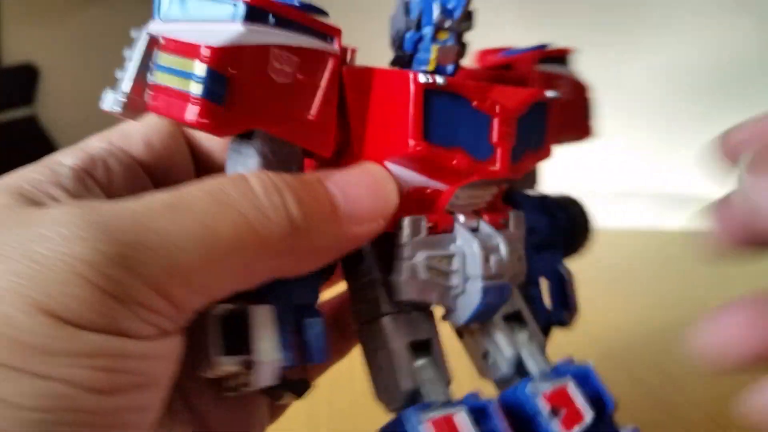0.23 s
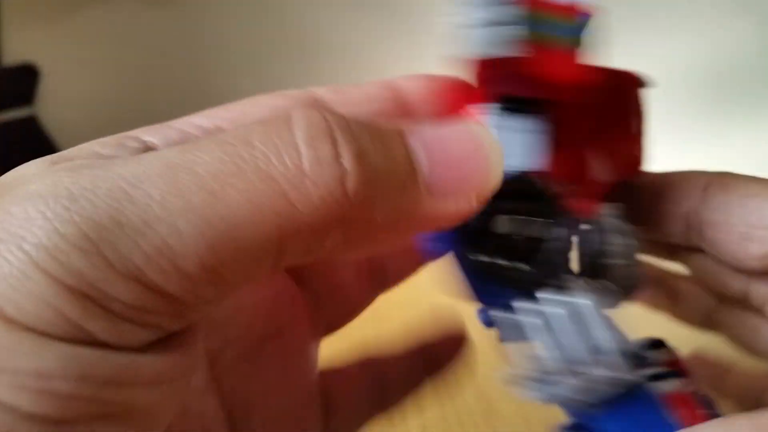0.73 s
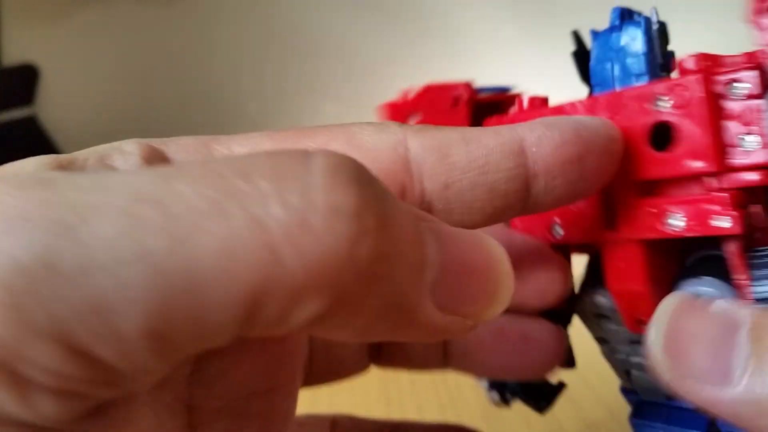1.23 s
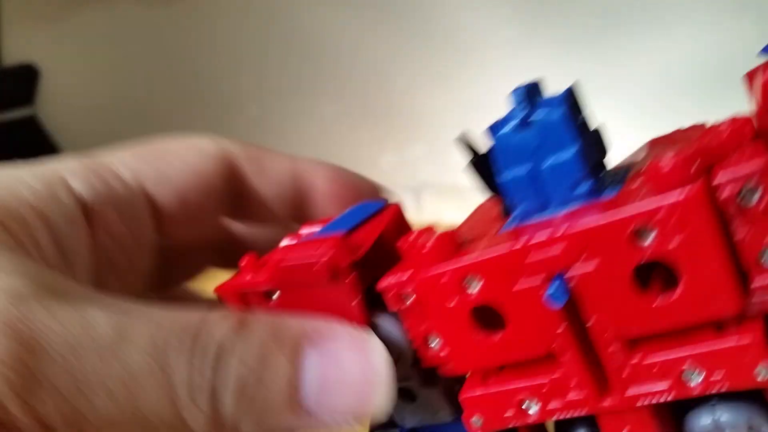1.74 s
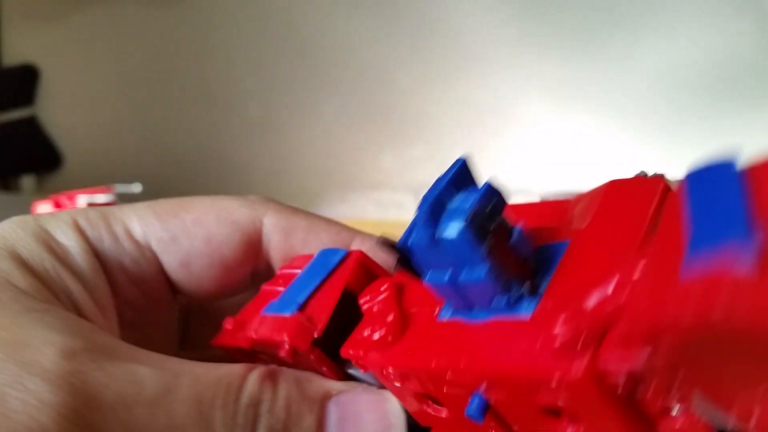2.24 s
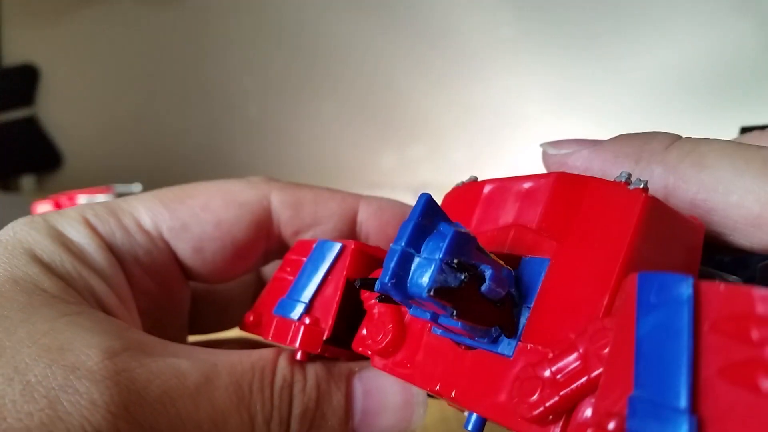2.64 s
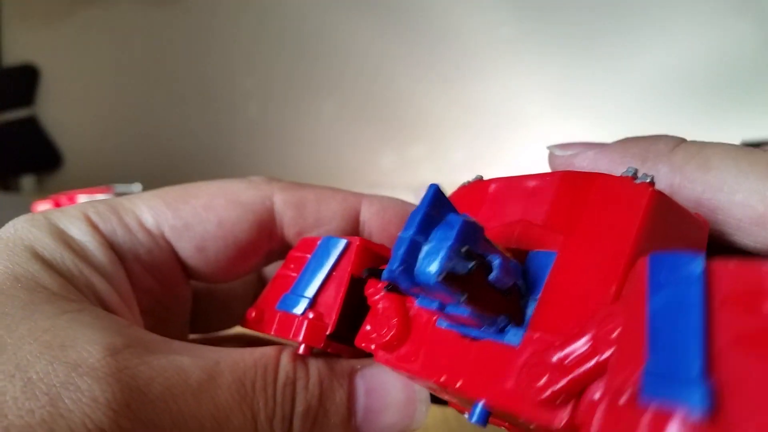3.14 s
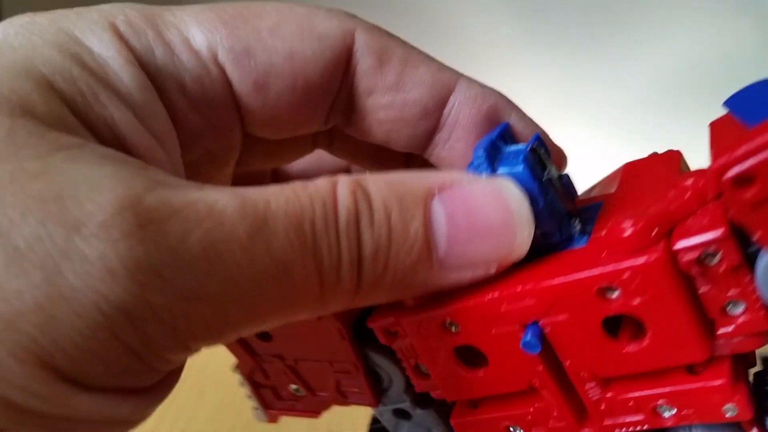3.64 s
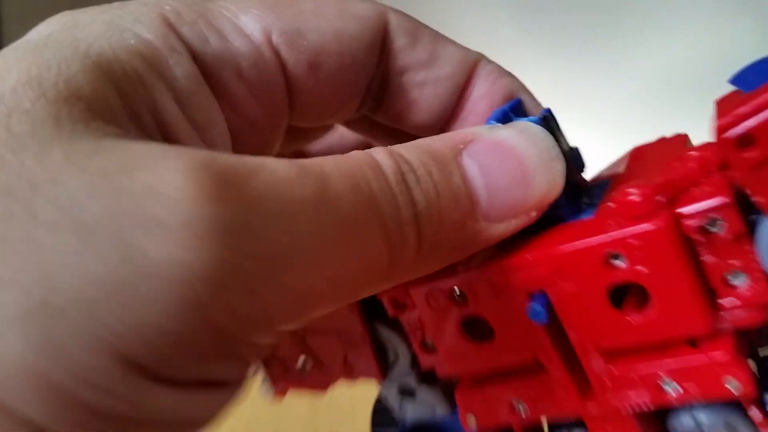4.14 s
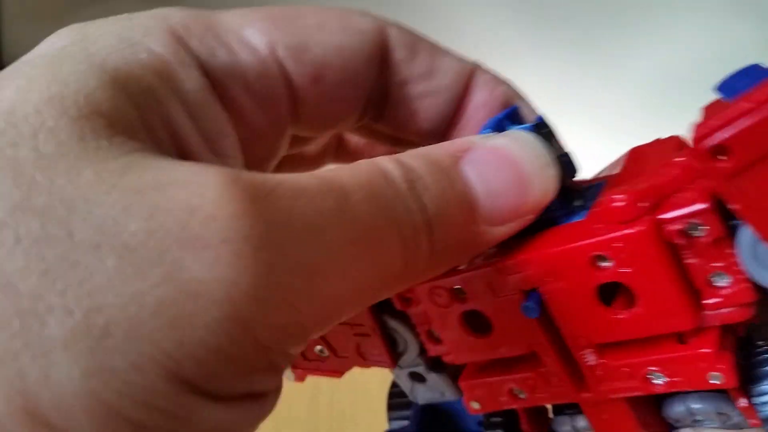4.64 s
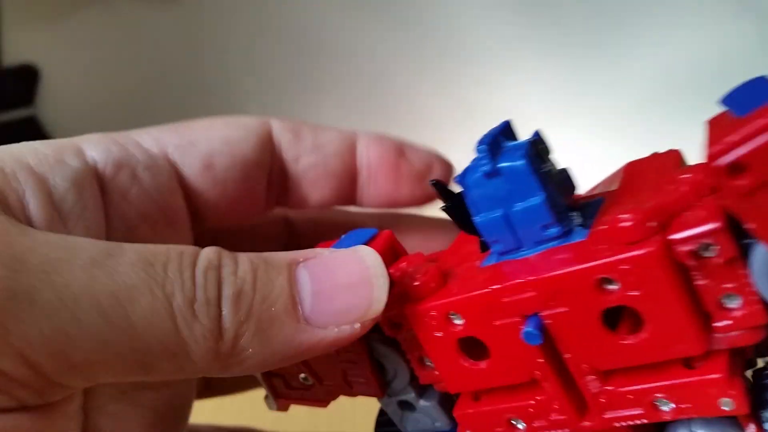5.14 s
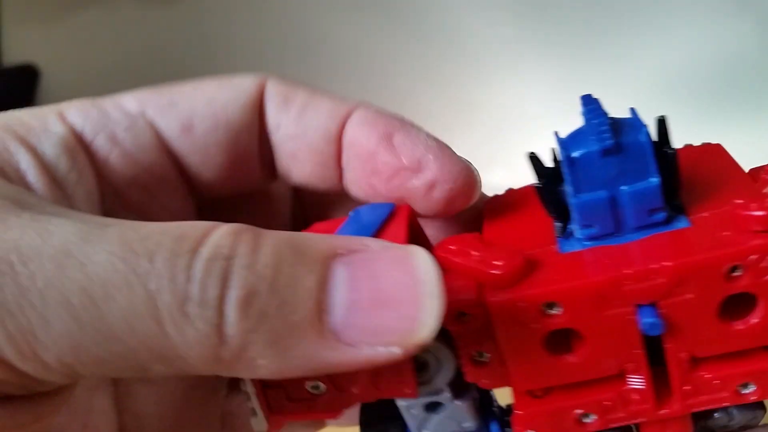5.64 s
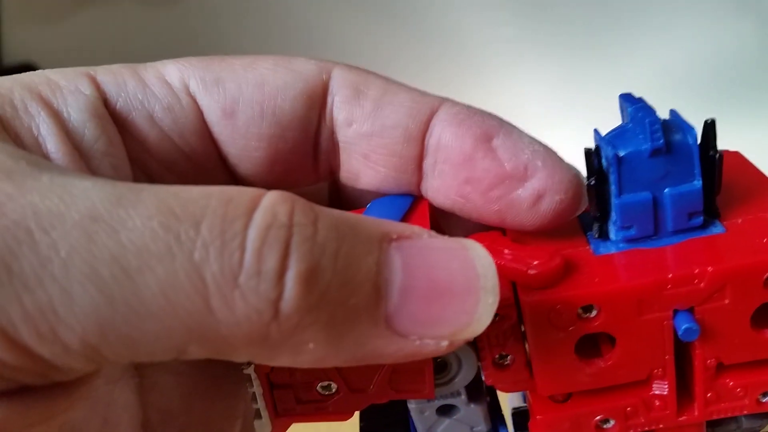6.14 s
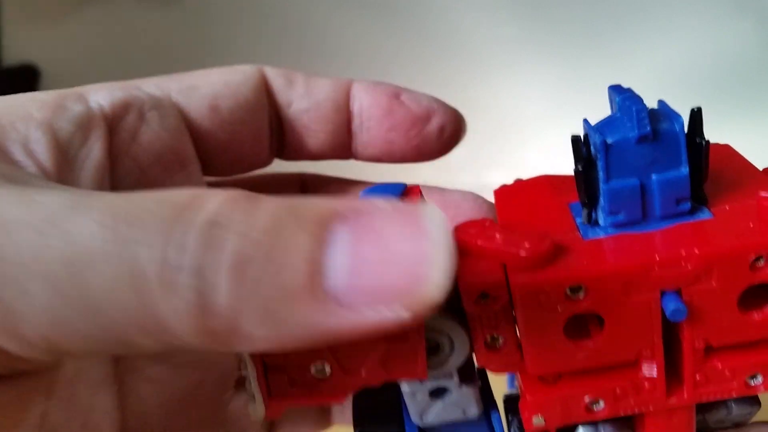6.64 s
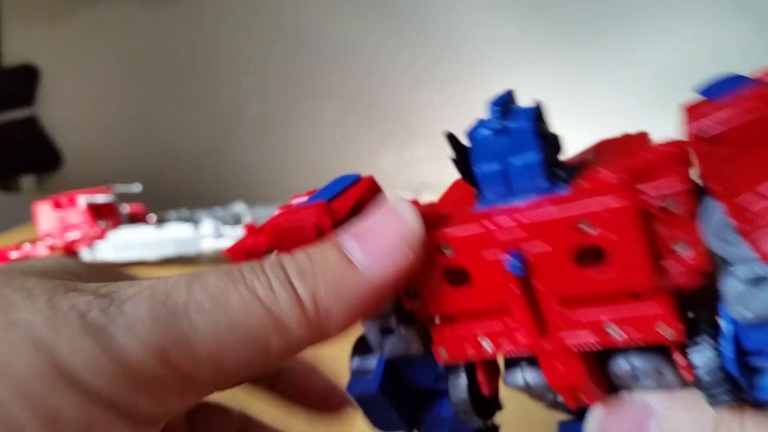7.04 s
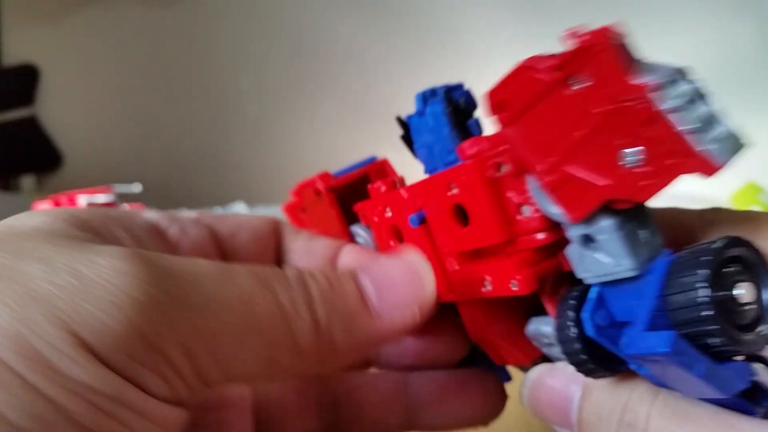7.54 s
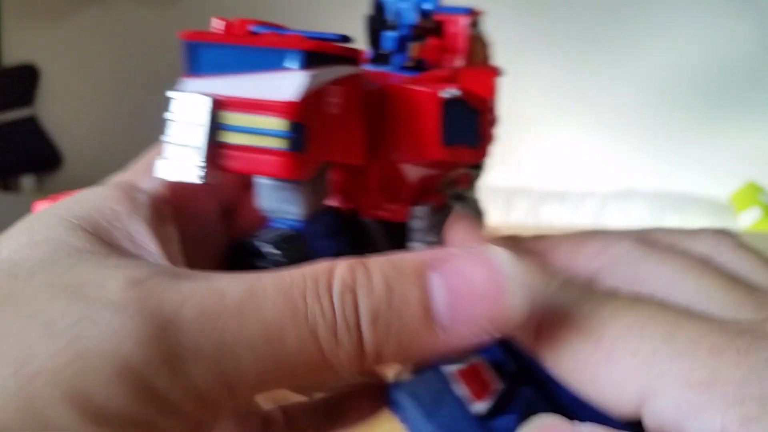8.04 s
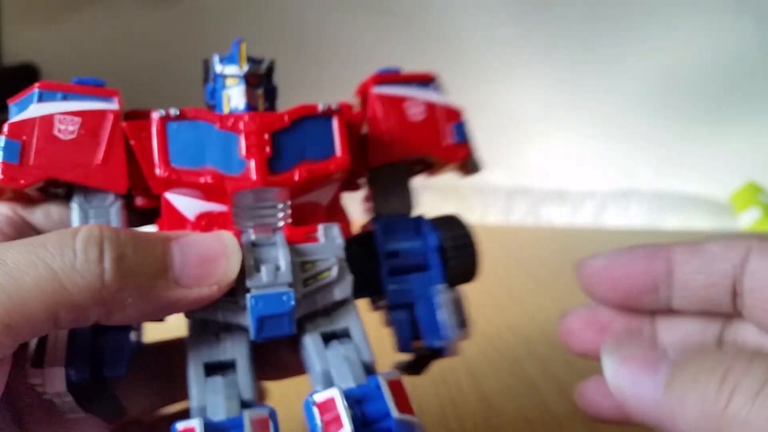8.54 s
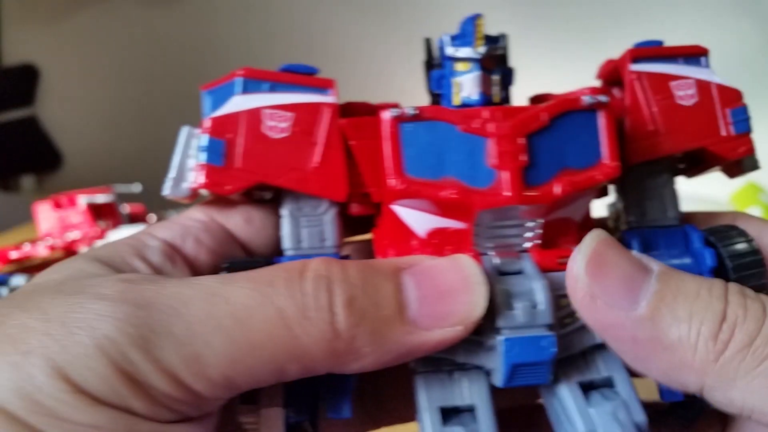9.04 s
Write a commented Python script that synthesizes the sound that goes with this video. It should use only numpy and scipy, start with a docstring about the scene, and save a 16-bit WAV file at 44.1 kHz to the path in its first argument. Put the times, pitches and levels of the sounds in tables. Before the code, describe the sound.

A hollow plastic toy robot is handled close by, a little to the left, in a small room. It starts with a sharp ratchet knock, then a quick cluster of snapping knocks from about 0.4 to 0.7 seconds. Loose parts click and rattle over finger rubbing until around 1.7 seconds, thinning to faint ticks and a lull from 2.5 seconds. Three duller joint knocks fall at about 3.9, 4.3 and 4.6 seconds, the last the strongest. Softer knocks and clicks follow just after 5 seconds, with gentle rubbing until 6. Light ticking resumes near 6.8 seconds. A firm knock at 7.7 opens a busier stretch of clicks, scraping and faint stick-slip squeaks, easing off after 8.7 with a small tick near 9.1. A low room rumble runs underneath, and a faint high hiss rises with the handling and sinks in the pauses.

```python
"""Dull ratchet knocks, ticks and rubbing: a hollow plastic toy robot turned over in two hands.
Joint detents thud the shell and snap its thin panels; loose parts click and rattle; fingers and stiff
joints stick and slip. The toy is a little to the left, above a desk in a small room. Behind it lie a
low rumble and a faint high hiss that the recorder's noise suppressor lowers in the pauses."""
import sys
import numpy as np
from scipy import signal
from scipy.fft import rfft, irfft, next_fast_len
from scipy.io import wavfile
from scipy.ndimage import uniform_filter1d

SR = 44100
rng = np.random.default_rng(int(sys.argv[2]) if len(sys.argv) > 2 else 0)


def generate_wav(signal):
    """Clip the signal to [-1, 1] and save it as 16-bit WAV at the path in sys.argv[1]."""
    frames = np.transpose(np.atleast_2d(signal))
    scaled = np.clip(frames, -1, 1) * 32767
    pcm = np.round(scaled).astype(np.int16)
    wavfile.write(sys.argv[1], SR, pcm)


N = 409248
PLASTIC_TOP_HZ = 7000  # low-pass on thuds and teeth


def knocks(contact_hz=1100, thud_db=-5.0, snap_lag_s=0.001238, rebound_s=0.012, rebound_db=3.5):
    """A detent drops into its notch, or once, at 6.82 s, a fingertip bumps the shell: the body thuds, panels
    snap, the pawl rebounds, teeth grate."""
    # (time [s], level [dB], hardness as spectral tilt [dB/octave], snap [dB rel], grating [dB rel])
    steps = [(0.078, -7.5, 15, -8.5, -43), (0.4406, -13.5, 10, -8, -34.5), (0.5619, -24.5, 18, -5, -50),
             (0.5883, -18, 13, -3, -40), (0.6606, -10.5, 8, -6.5, -39), (0.7011, -14.5, 3, -3.5, -38),
             (1.2571, -31.5, 4, -26, -48), (1.645, -29, -11, 0, -46), (3.899, -18.5, -9, -21.5, -48),
             (4.272, -17, -4, -22.5, -49), (4.5833, -11.5, -1.5, -21, -42), (5.056, -20.5, -12, -14.5, -56),
             (5.275, -26, -17, -18, -55), (5.346, -35, -25, -18, -53), (6.8247, -30, -36, -26, -56),
             (7.746, -11, -3, -12.5, -47), (8.013, -23.5, 17, -4, -45), (8.369, -23, 13, -10, -45),
             (8.436, -30.5, 16, -11, -42), (8.4671, -24, 14, -4.5, -45), (8.7132, -26.5, 14, -10.5, -56)]
    # hollow body: (frequency [Hz], level [dB], t60 [s])
    body_modes = [(209.6, -8, 0.029), (308, -13.5, 0.07), (370, 9.5, 0.01), (458, -16, 0.064),
                  (747, -2.5, 0.015), (866, -17.5, 0.045), (980, -19.5, 0.025), (1290, -27.5, .04),
                  (1410, -21, 0.025)]
    out, t = np.zeros(N), np.arange(SR // 10) / SR
    for s, db, hardness, snap_db, grate_db in steps:
        body = sum(from_db(mode_db + hardness * np.log2(hz / contact_hz)) * ring(t, hz, t60)
                   for hz, mode_db, t60 in body_modes)
        dull_hz = contact_hz * 2 ** (min(hardness, 0) / 41)  # a soft contact lasts longer
        thud = -peak_one(butter(butter(body, dull_hz, "low", order=3), 67, "high"))
        add(out, s, from_db(db + thud_db) * butter(thud, PLASTIC_TOP_HZ, "low", order=4))
        panels = snap(4100, edge_db=-24.0, note_db=-6.0, focus_db=-6.0)
        add(out, s + snap_lag_s, from_db(db + snap_db) * panels)
        add(out, s + rebound_s, from_db(db + grate_db + rebound_db) * pawl())
        add(out, s, from_db(db + grate_db) * teeth())
    return out


def snap(pitch_hz, edge_db, note_db, focus_db=2.0, focus_octaves=0.58, chatter_s=0.0051):
    """An edge chatters on a panel; the small part rings at its pitch and weights nearby panel modes."""
    # thin panels: (frequency [Hz], level [dB], t60 [s])
    panel_modes = [(1240, 8.5, 0.022), (1919, 14.5, 0.033), (2110, -2.5, 0.028), (2644, -2, 0.031),
                   (2686, -16.5, 0.0098), (3227, 9, 0.038), (3200, 2.5, 0.026), (3754, 5.5, 0.022),
                   (4304, 9.5, 0.00922), (5500, 9.5, 0.0053), (5730, 0.5, 0.027), (7300, 8, 0.006)]
    t = np.arange(SR // 16) / SR
    contacts = grit(len(t), per_s=3500) * np.exp(-(t / chatter_s) ** 2)
    contacts[0] = 1.8  # first blow
    hz, level_db, t60 = np.transpose(panel_modes)[:, :, None]
    near = np.exp(-(np.log2(hz / pitch_hz) / focus_octaves) ** 2)
    detune, strength, sign = rng.standard_normal((3, len(panel_modes), 1))
    gripped = ring(t, hz * (1 + detune / 18), np.minimum(t60, .012))  # the grip detunes and damps
    modes = np.sign(sign) * from_db(level_db + focus_db * near + 3.0 * strength) * gripped
    ringing = rms_one(signal.fftconvolve(contacts, modes.sum(axis=0))[:len(t)])
    unpitched = rms_one(butter(butter(contacts, 1769, "high"), 4000, "low"))
    panel = butter(ringing + from_db(-0.5) * unpitched, 1100, "high")
    panel = butter(panel, 8240, "low", order=6)
    panel = butter(panel, max(4300, 1.3 * pitch_hz), "low", order=6)  # the smallest parts are brighter
    note = butter(contacts, pitch_hz * np.array([0.87, 1.13]), "band")
    click = rms_one(rms_one(panel) + from_db(note_db) * rms_one(note))
    edge = butter(rng.standard_normal(len(t)) * decay(t, t60_s=0.012), 8800, "high", order=4)
    return 0.034 * (click + from_db(edge_db + 3.5) * rms_one(edge))


def pawl(pitch_hz=6750, chatter_s=0.00074):
    """The small stiff pawl falls back and chatters on one high note."""
    t = np.arange(SR // 20) / SR
    chatter = rng.standard_normal(len(t)) * np.exp(-t / chatter_s)
    return peak_one(butter(chatter, pitch_hz * np.array([0.93, 1.07]), "band"))


def teeth(t60_s=0.24, attack_s=0.007):
    """Ratchet teeth grate as they settle: dense grit on their resonances."""
    # (frequency [Hz], level [dB], t60 [s])
    tooth_modes = [(2500, 2.5, 0.0037), (3560, 1.5, .012), (4146, 0, .005), (5500, -9, .003),
                   (6750, -6.5, .009)]
    t = np.arange(SR // 5) / SR
    response = sum(from_db(db) * ring(t, hz, ring_s) for hz, db, ring_s in tooth_modes)
    grating = signal.fftconvolve(grit(len(t), per_s=3000), response)[:len(t)]
    grating = butter(butter(grating, 1800, "high"), PLASTIC_TOP_HZ, "low", order=10)
    return rms_one(grating) * decay(t, t60_s) * (1 - np.exp(-t / attack_s))


def ticks(gain_db=8.0):
    """Loose panels and pegs click against each other."""
    # (time [s], level [dB], part's pitch [Hz], sharp edge [dB rel], part's ring [dB rel])
    clicks = [(0.0813, -20.5, 6060, -16, -10), (0.178, -35, 6230, -7, -4), (0.329, -28, 1380, -23.5, -1.5),
              (0.379, -27, 3460, -21, -3), (0.52, -34, 2360, -12, -5), (0.537, -43, 3140, -4, -9),
              (0.5618, -21.5, 2630, -22, 3), (0.632, -38, 1950, -28, 4), (0.744, -30, 1370, -21, -6),
              (0.895, -36, 1970, -22, -3), (0.951, -33.5, 2400, -23, -16), (1.063, -31.5, 2520, -22, -3),
              (0.978, -38, 3300, -30, -6), (1.212, -51.5, 3550, -25, -15), (1.278, -35, 3270, -40, 3),
              (1.338, -30.5, 2180, -18, -23), (1.387, -40.5, 2300, -28, 5), (1.4575, -26.5, 1900, -29, -6),
              (1.54, -33.5, 2250, -19, -5), (1.6414, -35, 2210, -6.5, -13), (1.656, -32.5, 1860, -16, 3),
              (1.714, -39, 2120, -4, -11), (1.834, -52, 2040, -40, -4), (1.956, -57.5, 2140, -40, -5),
              (2.118, -47.5, 1850, -23, -17), (2.152, -43, 1840, -16, -14),
              (2.214, -45.5, 3200, -10.5, -18), (2.294, -44, 3000, -16, -1), (2.343, -48, 1990, -42, 9),
              (2.358, -52, 2330, -14, -9), (2.436, -57, 2290, -40, 1), (2.474, -59, 2250, -41, 6),
              (2.498, -57.5, 2350, -16, 2), (3.316, -43, 2210, -34, -5.5), (4.607, -43, 3700, -35, -1),
              (4.645, -49, 2200, -40, -2), (4.653, -48, 6630, -30, -4), (4.934, -51.5, 2700, -41.5, -13),
              (5.157, -49, 5630, -24, -7), (5.181, -33.5, 2400, -33, 0), (5.3442, -28, 3330, -30.5, 0.5),
              (5.56, -52, 2600, -35, -12), (5.615, -46.5, 3000, -35, -8), (5.681, -44, 3460, -40, 1),
              (5.74, -56, 2400, -35, -6), (6.679, -60, 2960, -39, 3), (6.772, -43, 2510, -22, -8),
              (6.793, -43.5, 2250, -8, -5), (7.045, -42, 3630, -52, 10), (7.153, -43, 2020, -37, 1),
              (7.204, -42, 2120, -40, -9), (7.252, -40.5, 2107, -32, 1), (7.275, -48, 2700, -35, 1),
              (7.3, -32.5, 3770, -33, -21), (7.345, -43, 2110, -35, -11), (7.778, -33.5, 3750, -13.5, 1),
              (8.0863, -40.5, 6200, -27, -12), (8.13, -33, 3120, -20, -4), (8.185, -42, 6300, -28, -9),
              (8.33, -33, 2600, -19, -1), (8.348, -31, 3900, -26, -10), (8.443, -43.5, 7300, -30, -12),
              (8.484, -35, 7400, -28, -17), (8.611, -40.5, 1640, -35, 3), (9.103, -43.5, 2090, -38, 10)]
    out = np.zeros(N)
    for s, db, pitch_hz, edge_db, note_db in clicks:
        add(out, s, from_db(db + gain_db) * snap(pitch_hz, edge_db, note_db))
    return out


def squeaks(slips_per_s=1800, spread_db=2.0):
    """Stick-slip on a gliding resonance: low and broad under a fingertip, high and narrow in a joint."""
    # (start [s], length [s], first pitch [Hz], last pitch [Hz], bandwidth [share of pitch], level [dB])
    glides = [(0.586, 0.022, 4110, 4030, .04, -50), (0.604, 0.049, 2980, 2880, .1, -56),
              (0.637, 0.024, 630, 700, 0.24, -41), (0.662, 0.064, 3940, 3900, 0.063, -44.5),
              (4.606, 0.03, 3530, 3570, 0.11, -64), (5.551, 0.34, 457, 493, 0.29, -55),
              (6.974, 0.095, 3780, 3770, 0.25, -64), (6.978, 0.034, 5160, 5130, 0.16, -71),
              (6.979, 0.09, 6900, 6800, 0.045, -86), (7.047, 0.24, 2980, 3080, 0.059, -69.5),
              (7.17, 0.049, 5500, 5500, 0.19, -70), (7.693, 0.04, 650, 630, 0.24, -47),
              (7.913, 0.073, 980, 1560, 0.55, -43), (7.952, 0.077, 850, 690, 0.38, -39.5),
              (7.975, 0.058, 1520, 1200, 0.67, -47), (8.222, 0.06, 620, 720, 0.77, -42),
              (8.265, 0.076, 1120, 1530, 1, -53), (8.701, 0.12, 720, 670, 0.3, -56)]
    out = np.zeros(N)
    for s, length_s, first_hz, last_hz, width, db in glides:
        size = int(length_s * SR)
        chance, strength = rng.random(SR // 2)[:size], rng.standard_normal(SR // 2)[:size]
        releases = (chance < slips_per_s / SR) * from_db(-spread_db * strength)
        carrier = np.exp(2j * np.pi * np.cumsum(np.linspace(first_hz, last_hz, size)) / SR)
        baseband = butter((releases - releases.mean()) / carrier, width * first_hz / 2, "low")
        tone = np.real(carrier * baseband)
        add(out, s, from_db(db) * rms_one(tone) * signal.windows.tukey(size, .4))
    return out


def hand_moves(attack_power=5.1, release_power=2.47):
    """Thrum, skin and scrape envelopes: each move swells, holds and eases off over the resting grip."""
    # (start [s], length [s], thrum [dB], skin [dB rel], scrape [dB rel])
    strokes = [(0, 0.2, -39, -5, -16), (0.292, 0.084, -38, -13, -19.5), (0.533, 0.04, -30.5, -4.5, -11.5),
               (0.63, 0.097, -45.5, 3, -4.5), (0.851, 0.13, -39, 5, -13), (1.025, 0.28, -53.5, -19, -26.5),
               (1.261, 0.092, -44, -1, -14.5), (1.488, 0.096, -50.5, 2, -11.5),
               (1.63, 0.099, -48, -23, -22.5), (1.766, 0.18, -60, -10, -19),
               (2.153, 0.072, -49.5, -12, -22.5), (2.927, 0.094, -52.5, -29, -56),
               (3.952, 0.38, -60, -12, -35), (5.064, 0.8, -50, -12, -40), (5.5, 0.25, -50, 0.5, -20.5),
               (6.94, 0.18, -50, 1.5, -25), (7.133, 0.092, -43.5, -4, -22),
               (7.292, 0.049, -45, -14.5, -25.5), (7.571, 0.065, -49, -3, -21.5),
               (7.703, 0.26, -44.5, 2, -17.5), (7.937, 0.087, -35, 3.5, -8), (8.112, 0.062, -46, 6, -8),
               (8.225, 0.14, -43, 7.5, -9.5), (8.434, 0.066, -46.5, -2, -10),
               (8.687, 0.089, -48.5, 4.5, -12.5), (8.758, 0.32, -52, 0.5, -23),
               (9.045, 0.27, -57.5, -8, -22.5)]
    t = np.arange(0, N + 100, 100) / SR
    power = from_db([-63.5, -68.5, -100])[:, None] ** 2  # resting grip
    for start_s, length_s, db, skin_db, scrape_db in strokes:
        place = 2 * (t - start_s) / length_s - 1  # -1 to 1 over the move
        speed = 1 / (1 + np.abs(place) ** np.where(place < 0, attack_power, release_power))
        power = power + np.outer(from_db([db, db + skin_db, db + scrape_db]), speed) ** 2
    return in_time(np.column_stack([t, *np.sqrt(power)]))


def rubbing(shake, slide, grind, thrum_db=-5.5, skin_db=-8.0):
    """Shifting fingers shake the hollow shell and slide on it while stiff joints scrape round."""
    # shell, skin and joint spectra: (frequency [Hz], level [dB])
    thrum_spectrum = [(30, -20), (80, 6.5), (120, 0.5), (155, -3), (200, 1), (300, 2.5), (480, -1.5),
                      (620, -11.5), (1000, -28.5), (3000, -87.5)]
    skin_spectrum = [(250, -23), (450, -5), (620, 2), (820, -3), (1050, -9.5), (1500, -14.5), (2200, -22.5),
                     (8000, -58.5)]
    scrape_spectrum = [(500, -17.5), (1000, -16), (1500, -6), (2000, 2.5), (2500, -4), (3100, 0), (3900, 0),
                       (5200, -15), (6800, -17.5), (8500, -26), (15000, -24)]
    thrum = coloured(slips(per_s=1500, spread_db=3.0, clump_db=2.0), thrum_spectrum)
    skin = coloured(slips(per_s=4000, spread_db=2.5, clump_db=3.2), skin_spectrum)
    scrape = coloured(slips(per_s=5000, spread_db=2.2, clump_db=1.3), scrape_spectrum)
    return shake * from_db(thrum_db) * thrum + slide * from_db(skin_db) * skin + grind * scrape


def slips(per_s, spread_db, clump_db):
    """Friction: tiny stick-slip releases of uneven size, in clumps."""
    sizes = from_db(spread_db * np.minimum(rng.exponential(1, N), 4)) * rng.choice([-1, 1], N)
    return sizes * (rng.random(N) < per_s / SR) * from_db(clump_db * drift(per_s=70))


def rattle(grind, count=110, gain_db=-45, spread_db=3, pitch_hz=2300, spread_octaves=0.23):
    """Loose parts tick faintly at random, louder the harder the joints are worked."""
    out, effort = np.zeros(N), rms_one(grind) ** 0.36
    for at, (size, pitch) in zip(rng.integers(0, N, count), rng.standard_normal((count, 2))):
        tick = snap(pitch_hz * 2 ** (spread_octaves * pitch), edge_db=-35.5, note_db=-5.5)
        add(out, at / SR, effort[at] * from_db(gain_db + spread_db * size) * tick)
    return out


def hand_scatter(x, hold_s=.12, delay_s=0.00061, decay_s=0.0028, low_hz=1325):
    """Short waves bounce off the moving hands, so their colour keeps changing."""
    out, t, hop = np.zeros((2, N)), np.arange(SR // 60) / SR, int(hold_s * SR)
    padded, fade = np.pad(x, (hop, 2 * hop)), signal.windows.cosine(2 * hop)
    envelope = (t > delay_s) * np.exp(-t / decay_s)
    for start in range(-hop, N, hop):
        piece = (padded[start + hop:start + 3 * hop] * fade)[max(-start, 0):]
        for side in out:
            bounces = butter(rng.standard_normal(len(t)) * envelope, low_hz, "high")
            add(side, start / SR, signal.fftconvolve(piece, bounces / np.linalg.norm(bounces)))
    return out


def room(x, echo_top_hz=1300, right_top_hz=6500, build_up_s=.006):
    """Direct sound, dull echoes from desk and walls, standing waves and a diffuse tail."""
    # nearby surfaces: (delay [s], gain [ratio])
    echoes = [(.0045, 0.15), (.00605, 0.29), (.0094, 0.3), (0.0133, 0.36), (0.0222, 0.14), (0.024, 0.089)]
    # standing waves: (frequency [Hz], level [dB], t60 [s])
    room_modes = [(197.3, -60, 0.47), (232.6, -53, 0.37), (304.4, -54, 0.36), (349.3, -47.5, 0.19),
                  (395, -53.5, 0.47), (464, -52.5, 0.078), (487.5, -57.5, 0.22), (630.4, -49.5, .2),
                  (766, -44.5, 0.084)]
    # tail decay: (frequency [Hz], t60 [s])
    tail_t60_s = [(100, .5), (400, .36), (1000, .28), (4000, .21), (8000, .13), (16000, .1)]
    # tail spectrum: (frequency [Hz], level [dB])
    tail_db = [(60, 13), (160, 10), (300, 6.5), (700, 5), (1500, 5.5), (2500, 1.5), (4000, 2.5), (6000, 2),
               (9000, 0.5), (16000, -2)]
    t = np.arange(SR * 3 // 5) / SR
    early = sum(gain * np.sinc((t - delay_s) * SR) for delay_s, gain in echoes)
    standing = sum(from_db(db) * ring(t, hz, t60) for hz, db, t60 in room_modes)
    left = signal.unit_impulse(len(t)) + butter(early, echo_top_hz, "low", order=3) + standing
    right = butter(left, right_top_hz, "low", order=1)  # the far microphone is shaded
    response = np.array([left, right])
    noise = diffuse_noise(len(t))
    build_up = 1 - np.exp(-(t / build_up_s) ** 2)
    edges_hz = np.geomspace(40, 20000, 13)
    for low, high in zip(edges_hz, edges_hz[1:]):
        hz = np.sqrt(low * high)
        fade = build_up * decay(t, at_hz(tail_t60_s, hz))
        band = butter(noise, [low, high], "band")
        response += from_db(at_hz(tail_db, hz)) * band * fade / np.linalg.norm(fade)
    return signal.fftconvolve(x[None], response, axes=1)[:, :N]


def diffuse_noise(samples):
    """A diffuse field at two microphones: alike in the bass only."""
    # (frequency [Hz], left-right correlation [-1..1])
    likeness = [(60, 1), (130, 0.52), (300, 0.65), (640, -0.11), (1400, -0.5), (16000, 0)]
    size = next_fast_len(samples)
    mid, side = rfft(rng.standard_normal((2, samples)), size)
    alike = np.clip(at_hz(likeness, np.fft.rfftfreq(size, 1 / SR)), -1, 1)
    both = np.sqrt((1 + alike) / 2) * mid + np.sqrt((1 - alike) / 2) * side * [[1], [-1]]
    return irfft(both, size)[:, :samples]


def rumble(gain_db=0.5, waver_db=1.4, hum_db=-62.0, hum_hz=48.4):
    """Low room noise that swells and sinks, with a wavering hum in it."""
    # (time [s], level [dB])
    swell = [(0, -50.5), (1, -48.5), (1.7, -52), (2.2, -55), (3, -54), (3.55, -56.5), (4.1, -52.5),
             (5.2, -53), (6, -55), (6.7, -53), (7.3, -54), (8.2, -46), (8.8, -49.5), (9.28, -49)]
    # (frequency [Hz], level [dB])
    spectrum = [(20, -16), (35, -19.5), (48, 6), (66, -13.5), (105, 3), (160, -5), (230, -6), (300, -9),
                (450, -13), (650, -14.5), (1000, -27), (1600, -45), (2700, -46), (6000, -60.5)]
    level_db = in_time(swell)[0] + gain_db + waver_db * drift(per_s=10.0)
    noise = coloured(diffuse_noise(N), spectrum)
    hum_gain = from_db(hum_db + 0.5 * drift(per_s=7.2))
    hum_phase = 2 * np.pi * hum_hz * np.arange(N) / SR + 1.1 * drift(per_s=3.8)
    return from_db(level_db) * noise + hum_gain * rms_one(np.sin(hum_phase))


def hiss(sound, hiss_db=-62.5, reference_db=-46, slope=1.12, settle_s=0.13, open_db=8.5):
    """A noise suppressor passes more high hiss while the sound is loud and shuts slowly in pauses."""
    # (frequency [Hz], level [dB])
    spectrum = [(1000, 6.5), (2000, -1.5), (2700, -15.5), (3400, 2), (4200, 2.5), (5000, -18.5),
                (6500, -22), (9500, -44.5), (12500, -19), (15500, -18)]
    level_db = 10 * np.log10(uniform_filter1d(np.mean(sound ** 2, axis=0), SR // 30) + 1e-12)
    wanted_db = np.minimum(slope * (level_db - reference_db), open_db)
    pole = np.exp(-1 / (settle_s * SR))
    gain_db = signal.lfilter([1 - pole], [1, -pole], wanted_db, zi=wanted_db[:1])[0]
    return from_db(hiss_db + gain_db) * coloured(rng.standard_normal((2, N)), spectrum)


def from_db(db):
    return 10 ** (np.asarray(db) / 20)


def rms_one(x):
    return x / np.sqrt(np.mean(x ** 2) + 1e-20)


def peak_one(x):
    return x / np.abs(x).max()


def in_time(rows):
    """Each column of a curve at every sample."""
    s, *columns = np.transpose(rows)
    return [np.interp(np.arange(N) / SR, s, c) for c in columns]


def at_hz(points, hz):
    """Read a curve on a log-frequency axis."""
    f, value = np.transpose(points)
    return np.interp(np.log(np.maximum(hz, 1)), np.log(f), value)


def butter(x, hz, kind, order=2):
    sos = signal.butter(order, np.clip(hz, 10, .48 * SR), kind, fs=SR, output="sos")
    return signal.sosfilt(sos, x + 1e-18)


def coloured(x, spectrum):
    """Give a steady signal a spectrum; rms 1."""
    size = next_fast_len(N)
    gain = from_db(at_hz(spectrum, np.fft.rfftfreq(size, 1 / SR)))
    return rms_one(irfft(rfft(x, size) * gain, size)[..., :N])


def drift(per_s):
    """Random wander with a spread near 1."""
    return np.interp(np.arange(N) / SR * per_s, np.arange(4000), rng.standard_normal(4000))


def grit(samples, per_s):
    """Impulses of random size at random times."""
    return rng.standard_normal(samples) * (rng.random(samples) < per_s / SR)


def decay(t, t60_s):
    return from_db(-60 * t / t60_s)


def ring(t, hz, t60_s):
    """One mode, struck at t = 0."""
    return np.cos(2 * np.pi * hz * t) * decay(t, t60_s)


def add(track, s, sound):
    """Mix a sound into a track at a time."""
    start = max(round(s * SR), 0)
    track[start:start + len(sound)] += sound[:N - start]


def scene():
    """The toy in its room."""
    shake, slide, grind = hand_moves()
    toy = knocks() + ticks() + squeaks() + rubbing(shake, slide, grind) + rattle(grind)
    return room(toy) + hand_scatter(toy) + rumble()


def record(dry, cutoff_hz=16000):
    """The recorder adds hiss; the left microphone hears the midrange louder; the top is cut."""
    # (frequency [Hz], left minus right [dB])
    balance = [(60, 0), (200, 4), (700, 8), (1300, 7.5), (2400, 8.5), (4400, 6), (7000, 0), (9000, 4.5),
               (15000, -3)]
    size = next_fast_len(N + SR // 10)
    lean_db = at_hz(balance, np.fft.rfftfreq(size, 1 / SR)) / 2
    leaning = irfft(rfft(dry + hiss(dry), size) * from_db([lean_db, -lean_db]), size)[:, :N]
    return signal.sosfilt(signal.ellip(10, .1, 70, cutoff_hz, fs=SR, output="sos"), leaning)


dry = scene()
out = record(dry)
generate_wav(out)
```